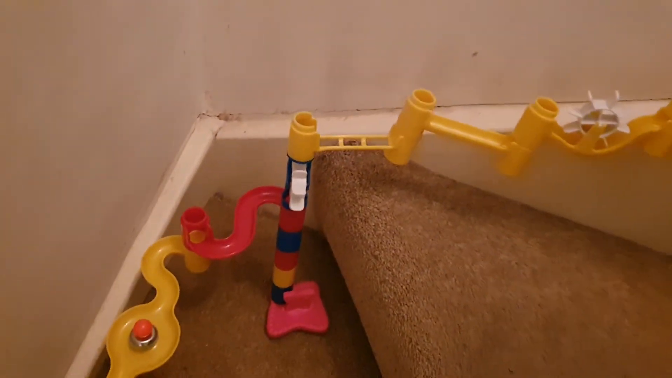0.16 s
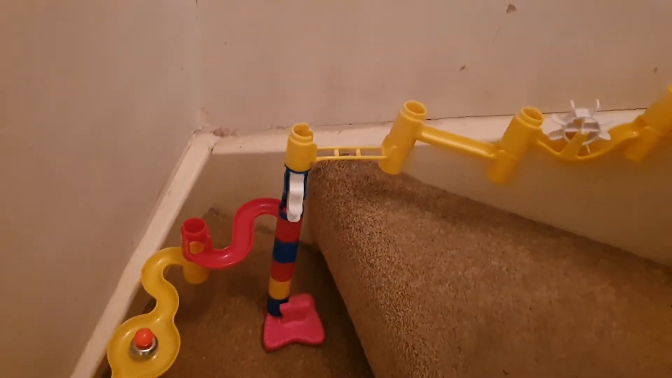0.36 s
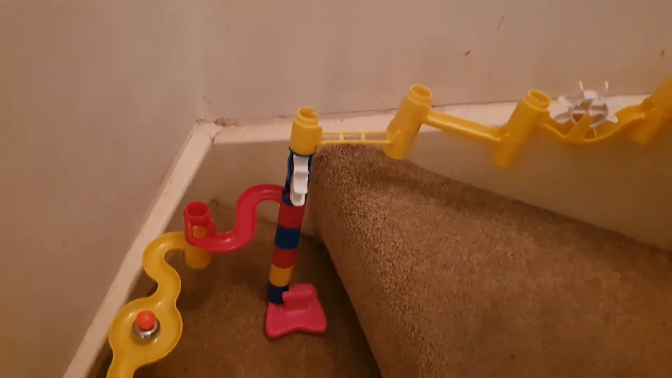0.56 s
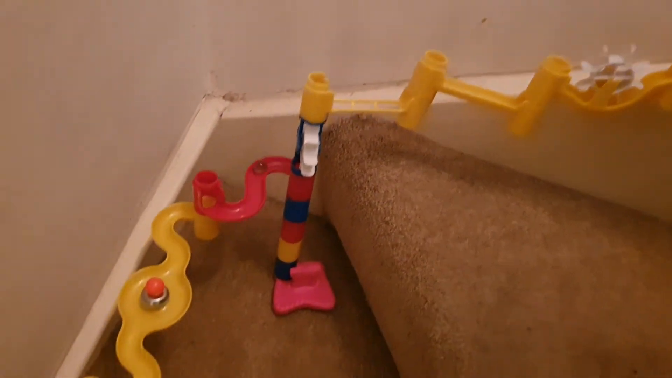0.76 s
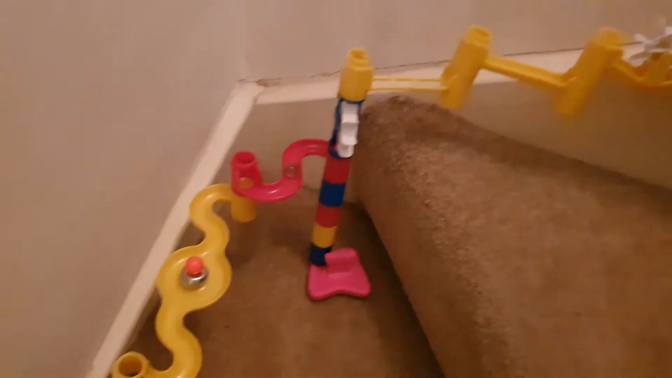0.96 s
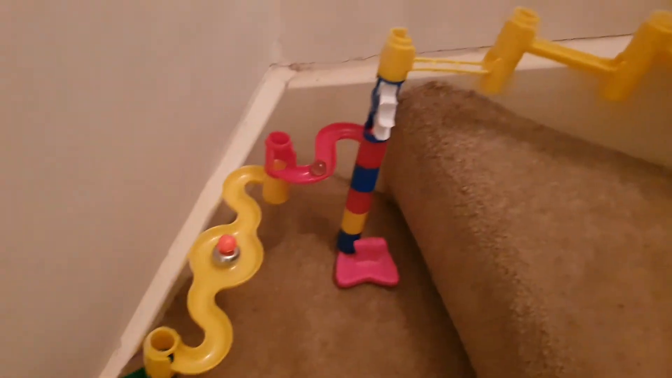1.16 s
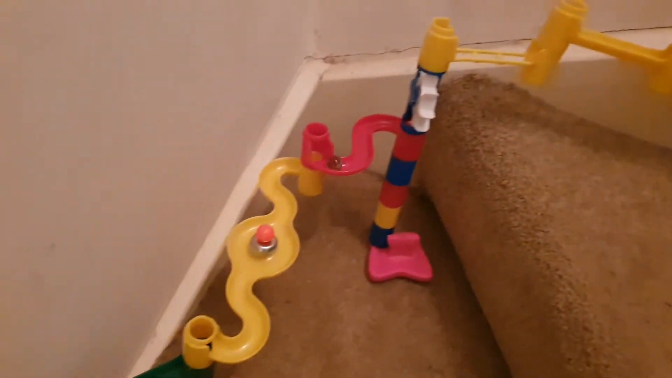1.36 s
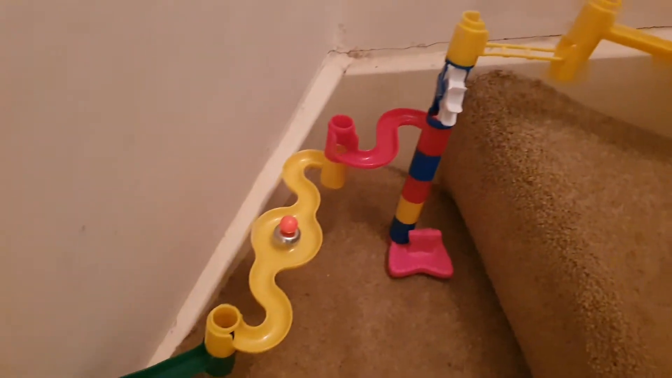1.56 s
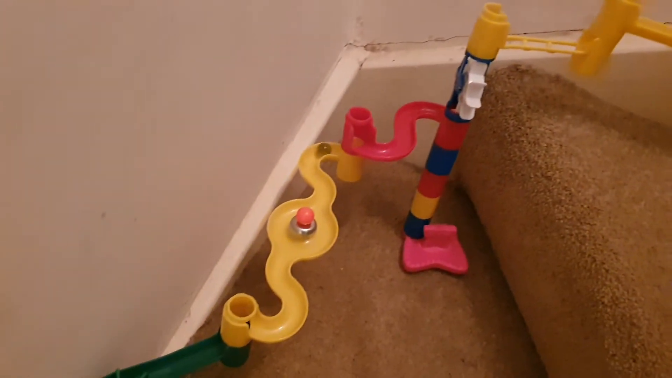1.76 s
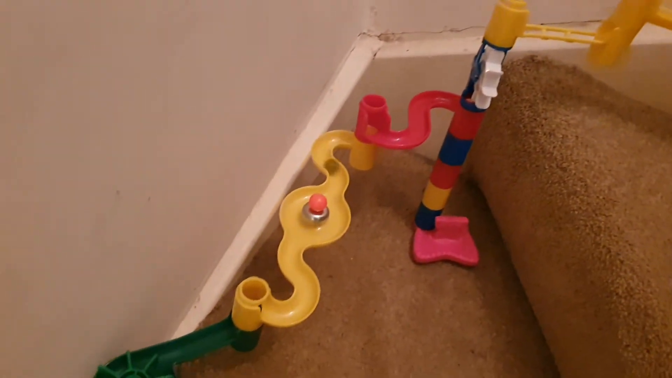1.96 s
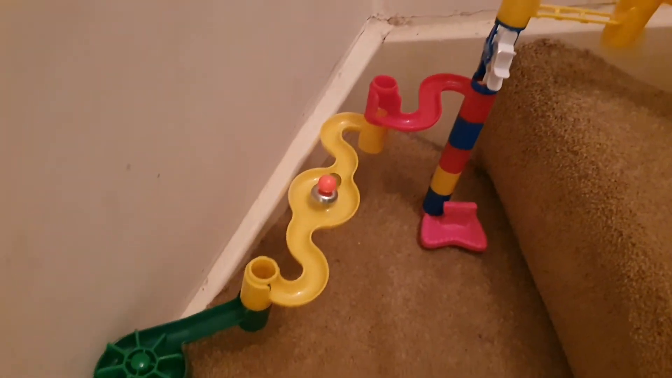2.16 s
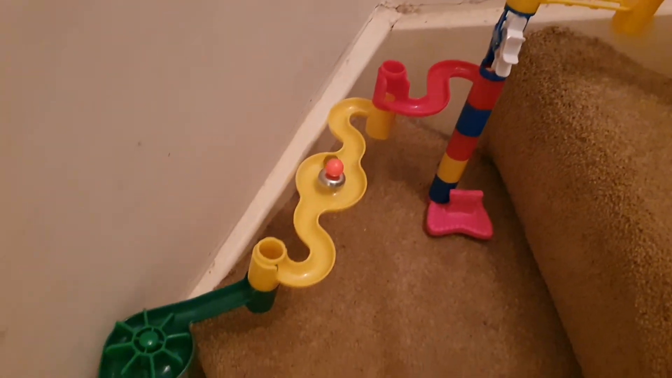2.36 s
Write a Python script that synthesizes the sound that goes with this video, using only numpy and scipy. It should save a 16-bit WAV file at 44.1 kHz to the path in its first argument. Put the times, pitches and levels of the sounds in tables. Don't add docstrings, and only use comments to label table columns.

```python
import sys
import numpy as np
from scipy import signal
from scipy.fft import rfft, irfft
from scipy.io import wavfile
from scipy.ndimage import uniform_filter1d

SR = 44100
rng = np.random.default_rng(int(sys.argv[2]) if len(sys.argv) > 2 else 0)


def unload_wav(signal):
    wavfile.write(
        sys.argv[1],
        SR,
        np.round(np.clip(np.atleast_2d(signal).T, -1, 1) * 32767).astype(np.int16),
    )


def field_ratio(decibels):
    return 10 ** (np.asarray(decibels, dtype=float) / 20)


N = 108045


def rms_one(x):
    return x / np.sqrt(np.mean(x ** 2) + 1e-20)


def in_time(rows):
    return np.interp(np.arange(N) / SR, *np.transpose(rows))


def at_hz(points, hz):
    table = np.array(points)
    return np.interp(np.log(hz), np.log(table[:, 0]), table[:, 1])


def drift(rate_hz):
    r = np.exp(-2 * np.pi * rate_hz * 40 / SR)
    white = rng.standard_normal(N // 40 + 2002)
    slow = signal.lfilter([1], [1, -2 * r, r * r], white)[2000:]
    return np.interp(np.arange(N) / 40, np.arange(len(slow)), rms_one(slow))


def ring(clicks, hz, t60_s):
    r = field_ratio(-60 / (t60_s * SR))
    w = 2 * np.pi * hz / SR
    return signal.lfilter([0, np.sin(w)], [1, -2 * r * np.cos(w), r * r], clicks + 1e-18)


def fade(clicks, t60_s):
    return signal.lfilter([1], [1, -field_ratio(-60 / (t60_s * SR))], clicks + 1e-18)


def clicks_at(s, size):
    train = np.zeros(np.shape(size)[:-1] + (N,))
    train[..., (np.asarray(s) * SR).astype(int)] = size
    return train


def bands(low_hz):
    edges = np.geomspace(low_hz, 17000, int(3 * np.log2(17000 / low_hz)))
    return [(np.sqrt(a * b), signal.butter(2, [a, b], "band", fs=SR, output="sos"))
            for a, b in zip(edges, edges[1:])]


# (f/Hz, likeness 0..1)
PORT_LIKENESS = [(60, .98), (150, .93), (500, 0.55), (1500, .1), (8000, 0.045)]


def wide_noise(gain_at, low_hz):
    out = 0
    white = rng.standard_normal((2, 2, N))
    for k, (hz, sos) in enumerate(bands(low_hz)):
        mid, side = signal.sosfilt(sos, white[k % 2])
        alike = np.clip(at_hz(PORT_LIKENESS, hz), -1, 1)
        pair = np.sqrt(1 + alike) * mid + np.sqrt(1 - alike) * side * [[1], [-1]]
        out = out + gain_at(hz) * pair
    return out


# (f/Hz, level/dB per Hz)
KNOCK_COLOUR = [(200, -28), (800, -10.5), (1600, -9), (3500, -5.5), (6400, -1.5), (10500, -10.5),
                (13500, -12), (15500, -17)]


def colour_db(knocks, tone, hz):
    _, db, _, treble_db, _ = np.transpose(knocks)
    treble_lift_db = 30.5
    return db + at_hz(KNOCK_COLOUR, hz) + at_hz(tone, hz) + (treble_db + treble_lift_db) * (hz > 7500)


# (f/Hz, share of the pan)
PORT_SHADOW = [(300, -.1), (800, 0.11), (2500, 0.081), (5000, 1.5), (9000, .3), (14000, .1)]


def piece(knocks, modes, tone, body_db, pan_db):
    chatter_t60_s, hollow_t60_s, crack_t60_s = 0.017, 0.059, 0.013
    hollow_level_db, crack_level_db, tick_db = -12, 2.5, 10.5
    s, db, hollow_hz, _, crack_db = np.transpose(knocks)
    norm = np.sqrt(2 * np.log(1000) / (chatter_t60_s * SR))
    luck_db = rng.normal(0, 0.97, (len(s), 14))

    walls = 0
    for k, (hz, level_db, t60_s) in enumerate(modes):
        hits = clicks_at(s, field_ratio(db + level_db + luck_db[:, k]))
        chatter = norm * rng.standard_normal(N) * fade(hits, chatter_t60_s)
        walls = walls + ring(chatter, hz, t60_s) * field_ratio(rng.normal(0, 4.8, (2, 1)))
    out = field_ratio(body_db) * walls

    age = np.arange(6000) / SR
    white = rng.standard_normal((2, N))
    for t, hz, size_db in zip(s, hollow_hz, db):
        span = slice(int(t * SR), int(t * SR) + len(age))
        fall = field_ratio(size_db + hollow_level_db - 60 * age / chatter_t60_s)
        out[:, span] += ring(norm * white[0, span] * fall, hz, hollow_t60_s)

    for k, (hz, sos) in enumerate(bands(400)):
        hits = clicks_at(s, field_ratio(colour_db(knocks, tone, hz) + crack_db + crack_level_db))
        tick = field_ratio(tick_db) * hits * (-1) ** k * (hz > 2500)
        out += signal.sosfilt(sos, white[k % 2] * fade(hits, crack_t60_s) + tick)

    pan = pan_db * at_hz(PORT_SHADOW, np.linspace(1, SR / 2, N // 2 + 1))
    return irfft(rfft(out) * field_ratio(pan * np.array([[.5], [-.5]])), N)


# (t/s, level/dB, hollow f/Hz, treble level/dB, crack level/dB)
TOWER_KNOCKS = [(0.1072, -39.5, 3370, -11.5, -5), (0.1965, -31.5, 3190, -3, -1.5),
                (0.2205, -11, 3940, -6, -1), (.2265, -13.5, 3940, -19, -6.5), (.2345, -18, 4300, -21.5, -6),
                (0.2458, -13.5, 3730, -9.5, -2.5), (0.2543, -12.5, 4100, -33, -2),
                (.2625, -22.5, 2730, -19, -5), (.278, -21.5, 4050, -24.5, -5.5), (0.2976, -14, 4120, -8, 4),
                (0.3014, -11.5, 2687, -22.5, -3.5), (.311, -19.5, 2700, -22.5, -5.5),
                (0.3953, -11, 3950, -19.5, -7), (0.4259, -18, 3950, -21, 2)]
FOOT_KNOCKS = [(.4585, -3.5, 2747, -13.5, 4), (0.4695, -14.5, 2680, -15.5, 0.5),
               (0.5021, -2.5, 3530, -18, 3.5), (.5058, -11, 3600, -19, 0), (0.5117, -11, 3450, -20.5, 4.5),
               (0.523, -11.5, 3560, -19.5, 6), (.5275, -14.5, 3560, -20.5, 1),
               (0.5537, -12.5, 3200, -24, 5), (.559, -21.5, 3200, -20.5, 0), (0.576, -32.5, 3200, -9.5, -4)]
CHUTE_KNOCKS = [
    (1.0385, -58, 1350, -29, -6.5),
    (1.5363, -7, 4320, -24, 1),
    (1.552, -19, 3000, -27.5, -4),
    (1.591, -6, 5600, -23, 6),
    (1.6018, -13, 4565, -28.5, 2),
    (1.615, -16, 2213, -27.5, 0.5),
]
BEND_KNOCKS = [
    (1.4625, -23, 2020, -23, -5),
    (1.4837, -42, 3030, -36, -9),
    (1.6335, -12, 2350, -18, -5),
    (1.642, -15, 2977, -24, 2.5),
    (1.6813, -24.5, 2530, -28.5, 3),
    (1.69, -26, 3340, -32.5, -3),
    (1.703, -34, 2977, -35, -8),
    (1.737, -38, 2213, -35, -5),
]
POST_KNOCKS = [
    (2.158, -19, 4030, -20.5, 1.5),
    (2.161, -13.5, 3880, -32.5, 3.5),
    (2.168, -18, 3420, -15.5, -1.5),
]
# (f/Hz, level/dB, t60/s)
TOWER_MODES = [(110, -15.5, 0.048), (520, -20, 0.066), (814, -12, 0.08), (1667, -4, 0.15),
               (2700, -11, 0.075), (3190, -14, 0.071), (3550, -10.5, 0.092), (3950, -13.5, 0.021),
               (4506, -13.5, .05), (5724, -8, .05), (6240, -13.5, 0.031)]
FOOT_MODES = [(109, -32.5, .15), (600, -27, 0.081), (1612, -21, 0.067), (2785, -15.5, 0.099),
              (3290, -13, .09), (3386, -17, .25), (3410, -12, .22), (3440, -10.5, .06), (3870, -7.5, 0.045),
              (4220, -9.5, 0.028), (4070, -5.5, 0.013), (4530, -11, .04), (4500, -15, .035)]
CHUTE_MODES = [(163, -27.5, 0.13), (836, -10, 0.14), (1647, -11.5, 0.091), (2213, -18, 0.097),
               (2842, -5, .1), (3402, -14, .12), (3700, -17.5, 0.13), (4565, -19, .1), (5080, -5, .06),
               (5604, -4, 0.051), (6190, -10.5, .05)]
BEND_MODES = [(846, -11.5, .2), (2213, -4, .18), (2400, -9, 0.23), (2977, -9.5, 0.31), (3035, -10, 0.27),
              (3440, -14, .2), (3688, -12, 0.18)]
POST_MODES = [(111.5, -19, 0.29), (920, -40, 0.059), (2780, -6.5, 0.18), (3940, -22, .06),
              (6260, 2.5, 0.026)]
# (f/Hz, level/dB)
TOWER_TONE = [(1000, 1), (3500, 0), (6000, -1.5)]
FOOT_TONE = [(1000, -8), (2300, -3), (4200, 2), (6300, -8), (9000, -2)]
CHUTE_TONE = [(1200, -0.5), (3000, 0.5), (5800, -1.5), (9000, -1), (15000, 4.5)]
BEND_TONE = [(1000, -1), (2600, 3.5), (6000, -4.5)]
POST_TONE = [(9000, 1), (13300, -3.5), (14800, 8.5), (15700, 10), (16300, -10)]


def pieces():
    return [(TOWER_KNOCKS, TOWER_MODES, TOWER_TONE, -11.5, -7),
            (FOOT_KNOCKS, FOOT_MODES, FOOT_TONE, -6.5, -7),
            (CHUTE_KNOCKS, CHUTE_MODES, CHUTE_TONE, -19.5, -11),
            (BEND_KNOCKS, BEND_MODES, BEND_TONE, -19.5, -12),
            (POST_KNOCKS, POST_MODES, POST_TONE, -13, -7.5)]


# (f/Hz, level/dB, t60/s)
BELL_MODES = [(2803, -7, .2), (2764, -14, .15), (2889, -13, .15), (4969, -1, .36), (12146, 9, .25),
              (12226, 5, .15), (12405, 5, .1), (15160, 6, .07), (15456, 4, .07)]


def bell():
    tap_s, level_db, pan_db = 2.1685, -27.5, -14
    tap = clicks_at([tap_s], field_ratio(level_db + pan_db * np.array([[.5], [-.5]])))
    return sum(field_ratio(db) * ring(tap, hz, t60_s) for hz, db, t60_s in BELL_MODES)


def placed(pair):
    right_lag_s = 0.0002811
    right = np.interp(np.arange(N) - right_lag_s * SR, np.arange(N), pair[1])
    return np.array([pair[0], right])


# (t/s, level/dB)
ROLL_LEVEL = [(0, -66.5), (.1, -56.5), (.18, -58.5), (.62, -51), (.72, -55.5), (.76, -47), (.815, -46.5),
              (.86, -59.5), (.97, -64), (1.03, -53), (1.1, -69.5), (1.4, -68), (1.68, -54), (1.8, -57.5),
              (1.91, -70), (1.97, -63), (2.1, -62), (2.45, -65)]
# (f/Hz, level/dB)
ROLL_COLOUR = [(300, -5), (600, -8.5), (1200, -12.5), (2000, -10.5), (4000, -10.5), (6500, -18.5),
               (11000, -9.5), (16000, -13)]


def rolling():
    grains_per_s, trim_db = 6600, 3
    size = field_ratio(2 * np.minimum(rng.exponential(1, (2, N)), 5))
    sign = rng.choice([-1, 1], (2, N))
    grains = size * sign * (rng.random(N) < grains_per_s / SR)
    sound = 0
    for k, (hz, sos) in enumerate(bands(294)):
        sound = sound + field_ratio(at_hz(ROLL_COLOUR, hz)) * signal.sosfilt(sos, grains) * (-1) ** k
    return field_ratio(in_time(ROLL_LEVEL) + trim_db + 2 * drift(19.0)) * rms_one(sound)


# (t/s, level/dB)
DRONE_LEVEL = [(1.4, -87.5), (1.55, -45), (1.9, -62), (1.97, -56), (2.13, -55), (2.3, -72), (2.45, -82)]
# (t/s, level/dB)
FAR_HISS_LEVEL = [(0, -58), (.7, -56.5), (.84, -60), (.93, -48.5), (1.08, -65), (1.15, -52), (1.2, -61),
                  (1.4, -56.5), (1.75, -77), (2.45, -83)]


def far_rolling():
    noise = rng.standard_normal((2, N))
    hiss = signal.sosfilt(signal.butter(2, 7800, "high", fs=SR, output="sos"), noise)
    drone = rms_one(ring(noise, hz=877, t60_s=0.023))
    return field_ratio(in_time(DRONE_LEVEL)) * drone + field_ratio(in_time(FAR_HISS_LEVEL) + 1.3 * drift(7.3)) * hiss


# (t/s, level/dB, f/Hz, t60/s)
STAIR_STEPS = [
    (.775, -44, 403, .1),
    (.79, -40, 230, .12),
    (1.0, -44, 170, 0.063),
    (1.035, -42.5, 687, 0.046),
    (1.06, -50, 342, 0.19),
    (1.262, -40, 150, 0.11),
    (1.285, -40.5, 74.5, .2),
    (1.4, -50, 110, 0.13),
]


def steps():
    out = 0
    for s, db, hz, t60_s in STAIR_STEPS:
        soft_push = uniform_filter1d(clicks_at([s], field_ratio([db])), size=int(.4 * SR / hz))
        out = out + ring(soft_push, hz, t60_s)
    return out


# (f/Hz, t60/s)
STAIRWELL_T60 = [(300, 1), (1000, 0.22), (3000, 0.28), (6000, 0.094), (14000, 0.14)]


def stairwell():
    parts = pieces()
    s = [row[0] for part in parts for row in part[0]]

    def gain_at(hz):
        level_db = np.concatenate([colour_db(knocks, tone, hz) for knocks, _, tone, _, _ in parts])
        power = fade(clicks_at(s, field_ratio(2 * level_db)), .5 * at_hz(STAIRWELL_T60, hz))
        return np.sqrt(power) * field_ratio(-10 + 2 * drift(54))

    return wide_noise(gain_at, 206)


# (t/s, level/dB)
BUMP_LEVEL = [(0.0, -50.5), (0.18, -58.5), (0.22, -40.5), (0.35, -51.5), (0.37, -57), (0.48, -40.5),
              (0.75, -59.5), (0.79, -47), (0.86, -61.5), (1.25, -56), (1.28, -47), (1.39, -57.5),
              (1.64, -43), (1.81, -58), (2.07, -63), (2.21, -53), (2.35, -65), (2.45, -61.5)]
# (f/Hz, level/dB)
BUMP_COLOUR = [(15, -37), (25, -1.5), (38, 2.5), (65, -2), (108, 2.5), (146, -7.5), (286, -17.5),
               (400, -14.5), (520, -46), (880, -120)]


def bumps():
    lump = drift(20)
    noise = wide_noise(lambda hz: field_ratio(at_hz(BUMP_COLOUR, hz) - 60 * (hz > 400) + 2.0 * lump), 25)
    return field_ratio(in_time(BUMP_LEVEL)) * rms_one(noise)


# (f/Hz, level/dB)
AIR_COLOUR = [(150, -10), (300, -18.5), (530, -10.5), (900, -19.5), (1500, -23.5), (4000, -28), (7000, -36),
              (16000, -43)]


def house():
    air_db, hum_db = -58.5, -63
    air = rms_one(wide_noise(lambda hz: field_ratio(at_hz(AIR_COLOUR, hz) + 1.8 * drift(1.4)), 154))
    hum = rms_one(ring(rng.standard_normal((2, N)), hz=528, t60_s=1))
    return field_ratio(air_db) * air + field_ratio(hum_db) * hum


def scene():
    run = sum(piece(*part) for part in pieces()) + bell()
    return placed(run) + rolling() + far_rolling() + steps() + stairwell() + bumps() + house()


def top_cut(x):
    return signal.sosfilt(signal.butter(12, 16440, fs=SR, output="sos"), x)


def record(dry):
    def cut(x, hz, kind):
        return signal.sosfilt(signal.cheby2(8, 50, hz, kind, fs=SR, output="sos"), x)

    step_hz, step_db = 6650, -18
    x = signal.sosfilt(signal.butter(6, 36, "high", fs=SR, output="sos"), dry)
    x = cut(x, 1.281 * step_hz, "low") + field_ratio(step_db) * cut(x, step_hz, "high")
    mix = cut(np.clip(x, -1, 1), 17100, "low")
    return top_cut(mix)


dry = scene()
out = record(dry)
unload_wav(out)
```